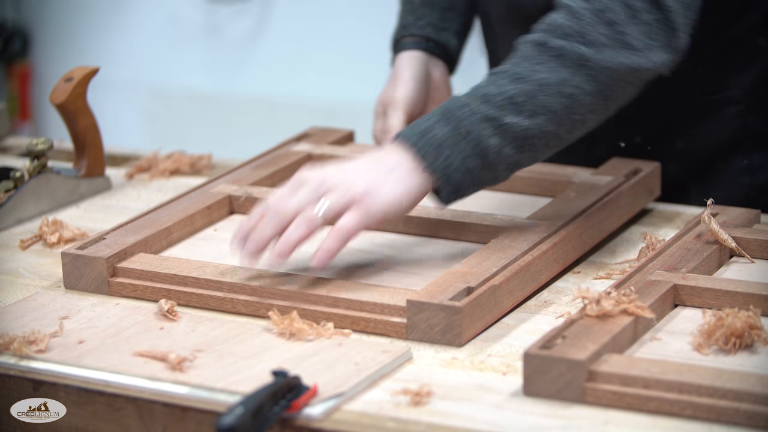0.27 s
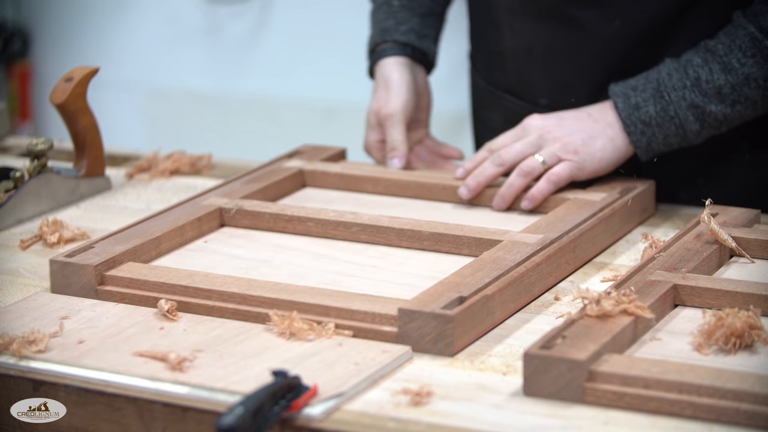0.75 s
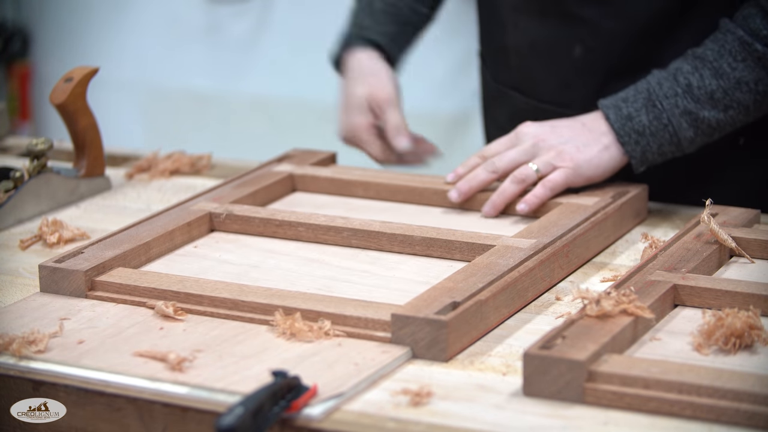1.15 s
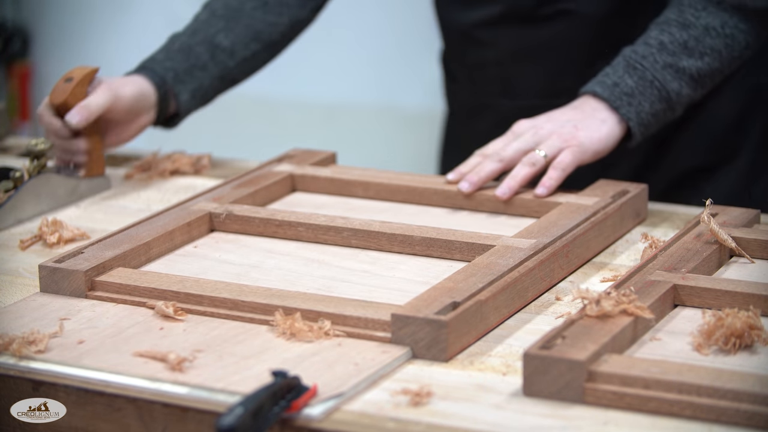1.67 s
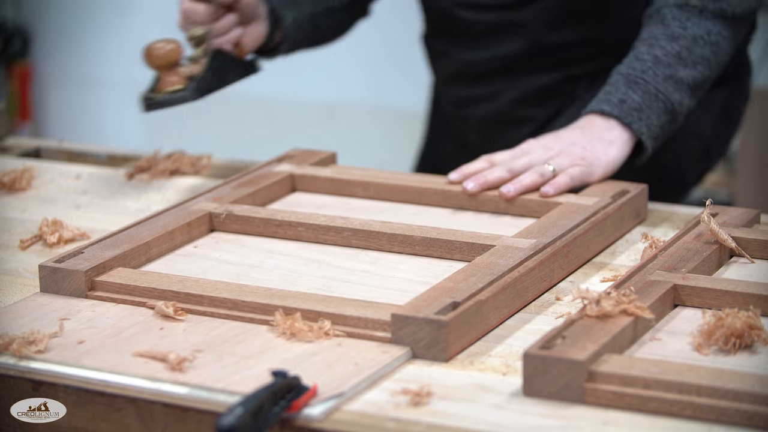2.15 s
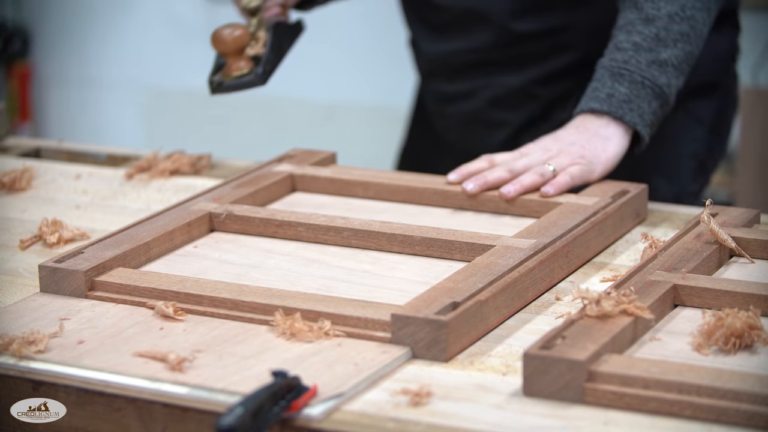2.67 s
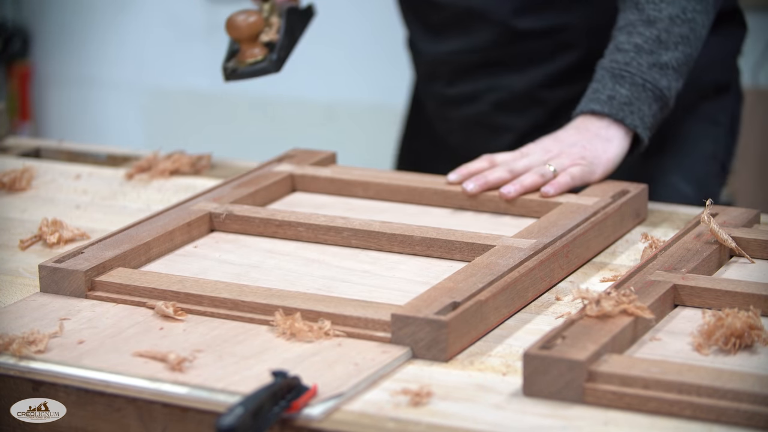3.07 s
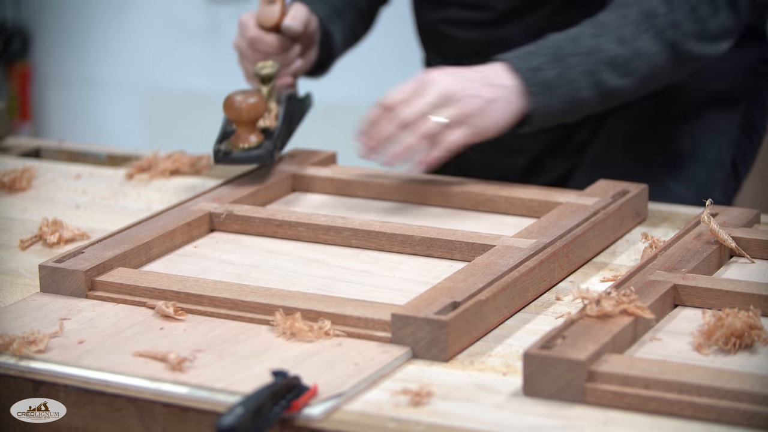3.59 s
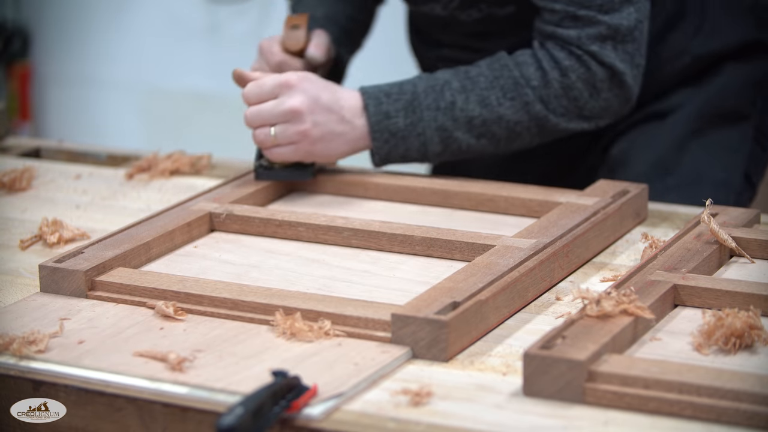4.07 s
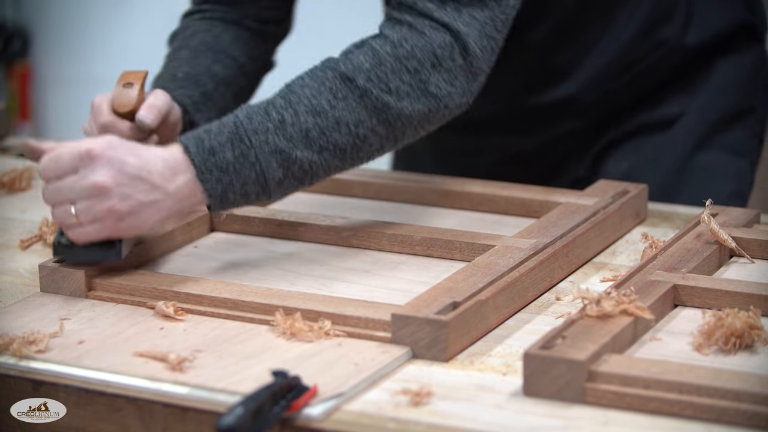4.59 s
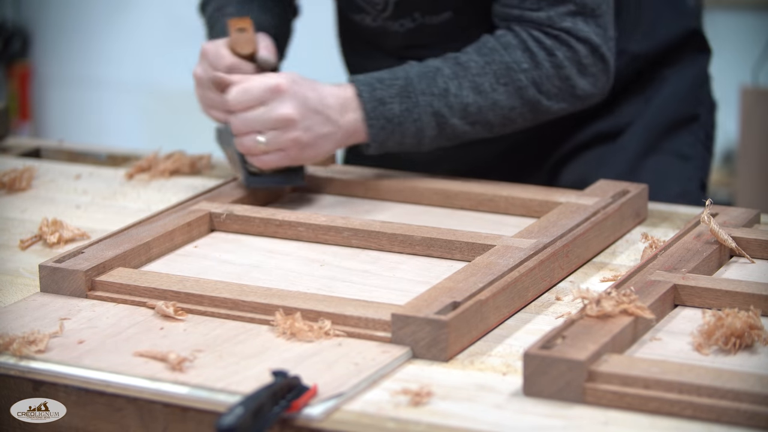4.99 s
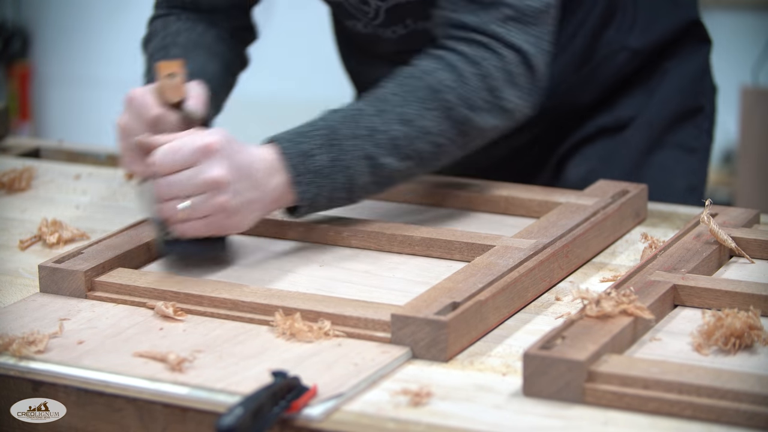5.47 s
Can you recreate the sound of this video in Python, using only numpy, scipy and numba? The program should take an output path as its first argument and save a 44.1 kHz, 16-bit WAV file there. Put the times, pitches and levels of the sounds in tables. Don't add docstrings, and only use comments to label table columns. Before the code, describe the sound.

In a hard-walled workshop, close stereo microphones catch a wooden frame knocked into place on a bench with quick, ringing knocks and sleeve rustle. Three duller blows sound further off, each weaker and echoing. A hand plane then taps down, rasps along the wood in a crisp scraping push, clacks down again, and makes a shorter stroke with a bright metallic catch. A low fan hums behind.

```python
import sys
import numpy as np
from scipy import signal
from scipy.fft import rfft, irfft, next_fast_len
from scipy.io import wavfile
from scipy.ndimage import uniform_filter1d, map_coordinates
from numba import njit

SR = 44100
rng = np.random.default_rng(int(sys.argv[2]) if len(sys.argv) > 2 else 0)


def int16_out(signal):
    q = np.round(np.clip(np.atleast_2d(signal).T, -1, 1) * 32767)
    wavfile.write(sys.argv[1], SR, q.astype(np.int16))


def convert_level_to_amplitude(level_db):
    exponent = np.asarray(level_db, float) / 20
    return 10 ** exponent


N = 252693


def unit(x):
    return x / np.sqrt(np.mean(x ** 2) + 1e-20)


def along(points, hz):
    f, v = np.transpose(points)
    return np.interp(np.log(hz + 1), np.log(f + 1), v)


def curves(tables):
    t, out = np.arange(N) / SR, -120
    for rows in tables:
        s, *cols = np.transpose(rows)
        out = np.maximum(out, [np.interp(t, s, c, left=-120, right=-120) for c in cols])
    return uniform_filter1d(out, size=600)


def wobble(rate):
    knots = rng.standard_normal(int(N * rate / SR) + 4)
    return map_coordinates(knots, [np.arange(N) * rate / SR])


def filtered(x, response):
    m = next_fast_len(x.shape[-1] + 8192)
    spectrum = rfft(x, m) * response(np.fft.rfftfreq(m, 1 / SR))
    return irfft(spectrum, m)[..., :x.shape[-1]]


def resonant(peaks, hz, lift_db, flip=1):
    total = 1
    for k, (centre, width, db) in enumerate(peaks):
        damping = 1j * hz * width
        total = total + flip ** k * convert_level_to_amplitude(db + lift_db) * damping / (centre * centre - hz * hz + damping)
    return total


def spread(pair, colour):
    # f/Hz, left-right likeness [0..1]
    alike = [(60, 1), (180, .997), (350, .975), (700, .88), (1650, .65), (4970, .36), (8000, .25),
             (15000, .5)]

    def mid_side(hz):
        turn = np.arccos(np.clip(along(alike, hz), -1, 1)) / 2
        return colour(hz) * np.array([np.cos(turn), np.sin(turn)])

    mid, side = filtered(pair, mid_side)
    return np.array([mid + side, mid - side])


def echo(stretch, build):
    # f/Hz, t60/s
    walls = [(100, 0.73), (300, 0.48), (700, 0.52), (2000, 0.56), (5000, 0.5), (13000, 0.28)]
    hz, t, z = signal.stft(rng.standard_normal((2, SR)), SR, nperseg=256)
    decay = convert_level_to_amplitude(-60 * t / (stretch * along(walls, hz))[:, None])
    tail = signal.istft(z * decay, SR, nperseg=256)[1][:, :SR]
    tail = spread(tail * (1 - np.exp(-np.arange(SR) / SR / build)) ** 2, lambda hz: 1)
    return tail / np.linalg.norm(tail[0])


def fibres(rate, size_db, patchy_db):
    struck = rng.random((2, N)) < rate / SR
    clicks = struck * rng.standard_normal((2, N)) * convert_level_to_amplitude(size_db * rng.exponential(size=(2, N)))
    z = signal.stft(rng.standard_normal((2, N)) + .6 * unit(clicks), nperseg=256)[2]
    field = uniform_filter1d(rng.standard_normal(z.shape[1:]), size=4, axis=0)
    field = uniform_filter1d(field, size=18, axis=1)
    return signal.istft(z * convert_level_to_amplitude(patchy_db * unit(field)), nperseg=256)[1][:, :N]


def fan():
    # t/s, hum level/dB
    hum_swells = [(0.0, -43), (0.83, -56), (0.91, -46), (1.53, -47), (1.68, -62), (2.01, -46), (2.6, -53),
                  (2.66, -65), (2.82, -46), (3.11, -49), (3.38, -41), (3.43, -53), (3.61, -37), (3.7, -54),
                  (3.77, -37), (4.2, -47), (4.28, -38), (5.73, -48)]
    # f/Hz, level/dB per Hz
    housing = [(20, -26), (32, -9), (42, 5.5), (52, 0), (70, -6), (95, -4), (125, -10.5), (170, -31),
               (300, -120)]
    # f/Hz, level/dB per Hz
    rush = [(65, -28), (110, -8), (200, -5.5), (375, -6), (860, -4), (1200, -6), (1800, -12), (2640, -22),
            (7000, -26.3), (15800, -42.5)]
    hum_swell_db, = curves([hum_swells])
    swing_db = hum_swell_db - hum_swell_db.mean()
    hum = np.sqrt(2) * np.sin(2 * np.pi * np.cumsum(59 + 1.8 * wobble(5.4)) / SR)
    rumble = unit(spread(rng.standard_normal((2, N)), lambda hz: convert_level_to_amplitude(along(housing, hz))))
    air = unit(spread(rng.standard_normal((2, N)), lambda hz: convert_level_to_amplitude(along(rush, hz))))
    hum_db = hum_swell_db + 1.5 * wobble(7)
    rumble_db = -48 + .3 * swing_db + 1.5 * wobble(4)
    air_db = -47 + .05 * swing_db + 0.52 * wobble(9)
    return convert_level_to_amplitude(hum_db) * hum + convert_level_to_amplitude(rumble_db) * rumble + convert_level_to_amplitude(air_db) * air


def sleeves():
    # t/s of the peak, time/s to rise 30 dB, time/s to fall 60 dB, level/dB
    brushes = [(0.01, .012, .1, -49), (0.915, .45, .15, -42), (1.158, .03, .2, -42.5),
               (1.495, .008, .3, -50), (1.525, .03, .25, -44), (1.632, .012, .15, -50), (1.79, .3, .4, -49),
               (1.95, .4, 1.5, -54), (2.2, .6, .6, -54), (4.04, .07, .7, -44), (4.93, .2, .9, -54)]
    # f/Hz, level/dB per Hz
    wool = [(880, -41), (1500, -5.5), (2290, -5), (3270, 0), (3400, -4.5), (4750, -3.5), (7400, -5),
            (15800, -21)]
    rub = convert_level_to_amplitude(0.49 * wobble(30.3)) * fibres(rate=800, size_db=2.5, patchy_db=1.5)
    s, rise, fall, peak_db = np.transpose(brushes)
    since = np.arange(N)[:, None] / SR - s
    brush = convert_level_to_amplitude(peak_db + np.minimum(30 * since / rise, -60 * since / fall)).sum(axis=1)
    return convert_level_to_amplitude(-3.5) * brush * unit(spread(rub, lambda hz: convert_level_to_amplitude(along(wool, hz))))


def squeaks():
    # t/s, length/s, f/Hz, level/dB
    slips = [
        (0.0, .05, 5200, -60),
        (0.0, .04, 5700, -58),
        (1.34, .1, 6350, -66),
        (1.4, .11, 4700, -63),
        (1.628, .03, 7200, -58),
        (5.07, .06, 5000, -66),
    ]
    out, t = np.zeros(N + SR), np.arange(SR // 2) / SR
    for s, length, hz, db in slips:
        waver = np.cumsum(rng.standard_normal(len(t))) * .03
        swell = np.sin(np.pi * np.clip(t / length, 0, 1))
        out[round(s * SR):][:len(t)] += convert_level_to_amplitude(db) * swell * np.sin(2 * np.pi * hz * t + waver)
    return out[:N]


def iron():
    # t/s, peak level/dB
    taps = [
        (1.6307, -46),
        (5.4321, -13.5),
    ]
    # f/Hz, width/Hz, level/dB
    casting = [(1580, 90, -3), (2220, 73, 6.5), (3060, 130, -8), (3800, 110, 3), (4100, 110, 3),
               (5800, 110, 1.5), (6520, 120, -11), (7000, 130, -11.5)]
    rattle, t = np.zeros(N + SR), np.arange(SR // 2) / SR
    for s, db in taps:
        rattle[round(s * SR):][:len(t)] += convert_level_to_amplitude(db - 13 - 60 * t / 0.033) * rng.standard_normal(len(t))
    return filtered(rattle[:N], lambda hz: resonant(casting, hz, 27.3, flip=-1) / (1 + (hz / 9000) ** 2))


def plane():
    # t/s, level/dB
    strokes = [
        [(4.15, -54), (4.225, -32.5), (4.27, -28.5), (4.37, -35), (4.466, -25), (4.56, -31.5), (4.66, -32.5),
         (4.71, -28), (4.86, -60.5)],
        [(5.27, -46), (5.32, -36.5), (5.42, -31), (5.47, -31), (5.515, -20.5), (5.545, -32), (5.62, -42),
         (5.72, -58)],
    ]
    # t/s, length/s, level/dB, level of the top/dB
    knots = [
        (4.48, 0.012, 4.5, 2.5),
        (4.59, .05, -.3, -6),
        (4.635, .008, 5, -1.5),
        (4.675, .012, -5, 1.5),
        (4.702, 0.016, 6, -6),
        (5.525, 0.013, 4, 1.5),
    ]
    # f/Hz, level/dB per Hz
    shaving = [(150, -6), (250, -2), (379, -8), (595, -3), (696, -7), (1000, -3.5), (1170, -6.5),
               (2260, -3.5), (4690, -4.5), (8030, -6), (15800, -19.5)]
    # f/Hz, width/Hz, level/dB
    sing = [(2300, 180, -9), (3150, 160, -1.5), (4120, 120, -8), (4800, 120, -4), (5950, 120, -14),
            (6700, 200, -5), (7900, 150, -7)]
    depth_db, = curves(strokes)
    s, length, grain_db, curl_db = np.transpose(knots)
    grain = np.exp(-((np.arange(N)[:, None] / SR - s) / length) ** 2)
    over_db = np.clip(depth_db + 32, -30, 30)
    cut_db = depth_db + grain @ grain_db
    top_db = -15.5 + .05 * over_db + grain @ curl_db
    body_db = 2.5 - .35 * over_db
    chatter = convert_level_to_amplitude(wobble(70) + 1.5 * wobble(200))
    tear = chatter * fibres(rate=2500, size_db=3, patchy_db=2.3)
    tear = unit(spread(tear, lambda hz: convert_level_to_amplitude(along(shaving, hz)) * resonant(sing, hz, 0)))
    top = filtered(tear, lambda hz: np.clip(hz / 3000 - 2, 0, 1))
    body = filtered(tear, lambda hz: np.clip(2 - hz / 900, 0, 1))
    return convert_level_to_amplitude(cut_db - 1.5) * (tear + (convert_level_to_amplitude(top_db + 13.5) - 1) * top + (convert_level_to_amplitude(body_db) - 1) * body)


def blows(events, body, ring_db, room_db, room_grows, rise, crack, stretch):
    # f/Hz, width/Hz, level/dB
    bench = [(154, 39, -16), (250, 16, -6), (340, 10, -1.5), (450, 12, 1.5), (590, 10, -1.5),
             (735, 12, 1.5), (945, 10, -3), (1075, 12, 3)]
    out, t = np.zeros((2, N + 2 * SR)), np.arange(SR) / SR
    for s, db, treble_db, thump_hz, thump_db in events:

        def colour(hz):
            octaves = np.log2(hz / 1200 + 1e-9)
            hard = convert_level_to_amplitude((treble_db + 15) * np.clip(octaves / 2, 0, 1))
            thump = resonant([(thump_hz, 0.38 * thump_hz, thump_db)], hz, 0)
            return convert_level_to_amplitude(along(body, hz)) * hard * thump * resonant(bench, hz, ring_db)

        burst = rng.standard_normal(SR) * (1 - np.exp(-t / rise)) ** 2 * convert_level_to_amplitude(-60 * t / crack)
        room = convert_level_to_amplitude(room_db + room_grows * (db - events[0][1])) * echo(stretch, rise)
        burst = filtered(burst / np.linalg.norm(burst) + room, colour)
        treble = filtered(burst, lambda hz: np.clip(hz / 2500 - 1, 0, 1))
        burst = burst - treble * np.exp(-t / (1.74 * rise))
        start = round((s - 1.3 * rise) * SR)
        out[:, start:][:, :SR] += convert_level_to_amplitude(db + 31) * burst / np.linalg.norm(burst[0])
    return out[:, :N]


def mallet():
    # t/s, peak level/dB, treble/dB, thump f/Hz, thump level/dB
    strikes = [
        (2.258, -5, -11, 730, -5.5),
        (2.762, -10.5, -12, 961, -13),
        (3.141, -13.5, -12, 780, -20),
    ]
    # f/Hz, level/dB per Hz
    far_body = [(53, -52), (90, -9.5), (527, 1.5), (667, 1.5), (864, -2.5), (942, 1.5), (1000, -1),
                (1480, 0.5), (3580, -3), (6840, -14.5), (15500, -47)]
    return blows(strikes, far_body, ring_db=-2.5, room_db=21, room_grows=2.05, rise=.0085, crack=0.13,
                 stretch=0.92)


def sole():
    # t/s, peak level/dB, treble/dB, thump f/Hz, thump level/dB
    contacts = [
        (3.9, -17, -19.5, 500, 2.3),
        (3.924, -21, -36, 720, 4),
        (4.025, -26.5, -36, 430, 2.5),
        (5.14, -11, -16.5, 457, 1),
        (5.16, -12, -16, 437, -1.5),
        (5.28, -23, -34, 322, 6.2),
        (5.433, -20.5, -0.5, 790, 1.7),
    ]
    # f/Hz, level/dB per Hz
    sole_body = [(55, -44), (95, -9), (180, -10.5), (450, -5.5), (750, -8), (1100, -11.5), (1700, -12),
                 (3000, -20), (6000, -28.5), (15500, -53)]
    return blows(contacts, sole_body, ring_db=0.5, room_db=4, room_grows=-.15, rise=.0012, crack=0.06,
                 stretch=0.74)


def ringing():
    # t/s, f/Hz, level/dB, t60/s
    rings = [(0.047, 247, -21.5, .2), (0.064, 826, -21, 0.17), (0.068, 1150, -20, .2),
             (0.206, 241, -10.5, 0.22), (0.21, 767, -16, .22), (0.276, 461, -13, 0.34),
             (0.575, 243, -21, .2), (0.58, 694, -29, 0.18), (0.6, 95, -36, .5), (0.925, 43, -33, .6),
             (0.925, 102, -30, .8), (0.923, 151, -23, 0.42), (0.926, 373, -19, .2), (0.93, 260, -24, 0.21),
             (1.857, 160, -38, 0.22), (3.903, 735, -21, .15), (4.04, 141, -31, 0.4), (4.54, 124, -34, .25),
             (5.143, 762, -11, .15), (5.166, 337, -17, 0.3), (3.15, 44, -36, .8), (3.905, 95, -38, .5),
             (5.145, 80, -34, .6), (5.44, 95, -33, .6), (5.27, 108, -33, .5), (5.2, 143, -36, 0.33),
             (5.436, 192, -24.5, 0.28), (5.44, 592, -23, .2), (5.435, 797, -25, 0.15)]
    out, t = np.zeros(N + SR), np.arange(SR // 2) / SR
    for s, hz, db, t60 in rings:
        waver = np.cumsum(rng.standard_normal(len(t))) * .04
        swell = 1 - np.exp(-t / 0.0042)
        out[round(s * SR):][:len(t)] += convert_level_to_amplitude(db - 60 * t / t60) * swell * np.sin(2 * np.pi * hz * t + waver)
    return out[:N]


def frame():
    # t/s, peak level/dB, treble/dB, thump f/Hz, thump level/dB
    hits = [
        (0.040, -27, -16, 690, 12),
        (0.060, -12.5, -11.5, 830, -0.5),
        (0.074, -24, -19, 240, 24),
        (0.207, -11.5, -13, 766, -2),
        (0.222, -20.5, -14, 910, 5),
        (0.252, -6, -11.5, 470, -11),
        (0.572, -9, -10.5, 650, 1),
        (0.918, -12, -5, 386, 23),
        (0.935, -26.5, -6, 140, 31),
        (1.858, -35, -47, 312, 23),
    ]
    # t/s, peak level/dB, treble/dB, thump f/Hz, thump level/dB
    slides = [
        (0.68, -27, -13, 1400, -2.5),
        (0.83, -39, -16, 450, 1.5),
        (4.1, -37, -22, 200, 8),
        (5.62, -36, -30, 750, 5),
    ]
    # f/Hz, level/dB per Hz
    frame_body = [(53, -62), (90, -17), (191, -11.5), (242, -3.5), (301, -3.5), (626, -1.5), (759, -1),
                  (1250, -4), (2090, -7.5), (5750, -20.5), (15500, -53)]
    knocks = blows(hits, frame_body, ring_db=0.5, room_db=4, room_grows=0.0, rise=.004, crack=0.088,
                   stretch=0.9)
    return knocks + blows(slides, frame_body, ring_db=0.4, room_db=3, room_grows=0.0, rise=.025, crack=0.3,
                          stretch=0.9)


def scene():
    # f/Hz, left minus right/dB
    lean = [(100, 0), (1000, -.6), (3000, -.5), (6000, .2), (10000, .6)]
    rub = plane() + sleeves() + iron() + squeaks()
    room = signal.fftconvolve(rub[:1], echo(stretch=0.99, build=0.0019), axes=1)[:, :N]
    rub = 1.05 * rub + convert_level_to_amplitude(-3.5) * room
    near = frame() + mallet() + sole() + ringing() + rub
    return filtered(near, lambda hz: convert_level_to_amplitude(np.outer([.5, -.5], along(lean, hz)))) + fan()


@njit
def follow(level, attack, release):
    out = level.copy()
    for i in range(1, len(out)):
        speed = attack if level[i] > out[i - 1] else release
        out[i] = out[i - 1] + (level[i] - out[i - 1]) * speed
    return out


def low_pass(x):
    return signal.sosfilt(signal.butter(12, 16240, fs=SR, output="sos"), x)


def record(dry):
    level = follow(np.abs(dry).max(axis=0), 1 / (0.0009 * SR), 1 / (0.0094 * SR))
    held = dry * (1 + (level / convert_level_to_amplitude(-11)) ** 3) ** -.3
    held = filtered(held, lambda hz: (hz < 15830) / np.sqrt(1 + (36 / (hz + 1)) ** 8))
    return low_pass(held)


dry = scene()
out = record(dry)
int16_out(out)
```